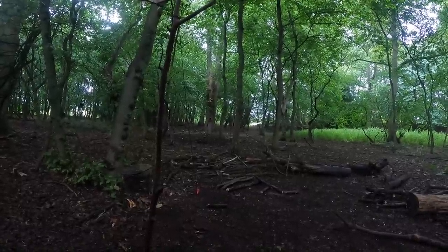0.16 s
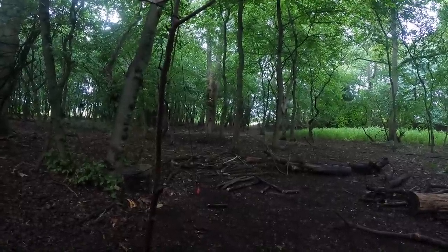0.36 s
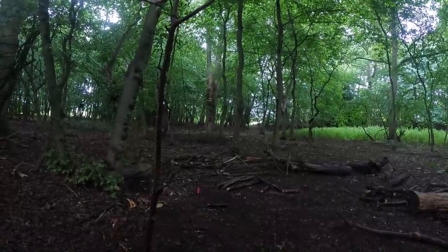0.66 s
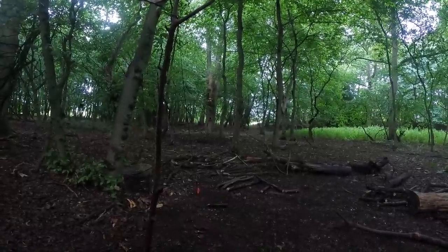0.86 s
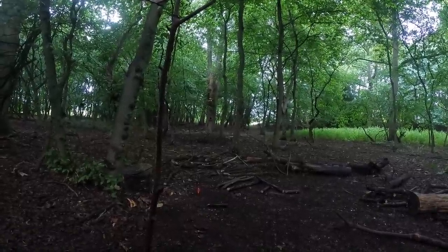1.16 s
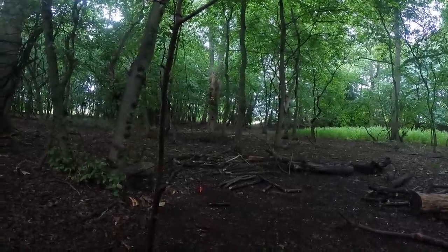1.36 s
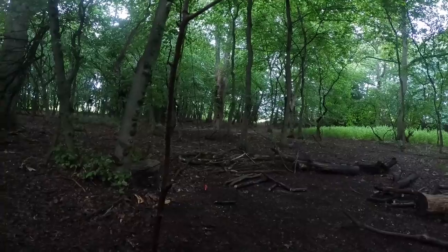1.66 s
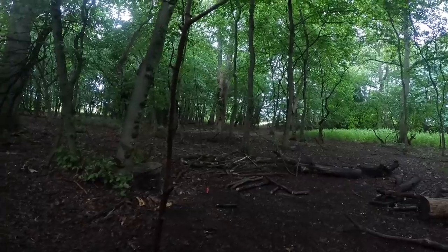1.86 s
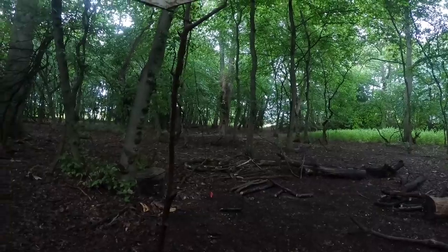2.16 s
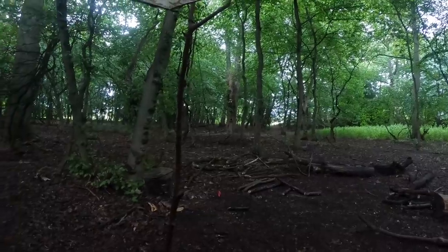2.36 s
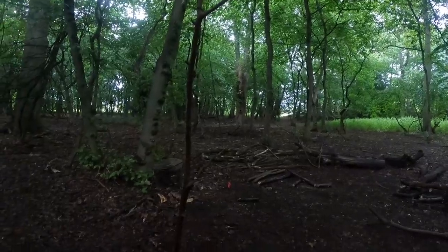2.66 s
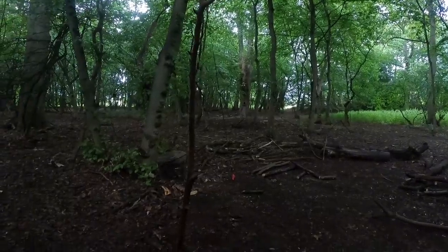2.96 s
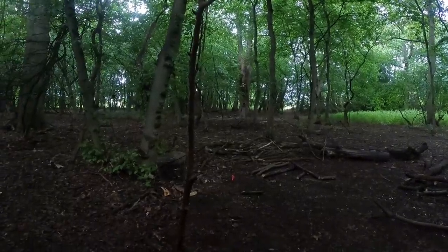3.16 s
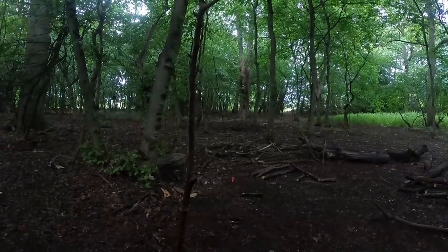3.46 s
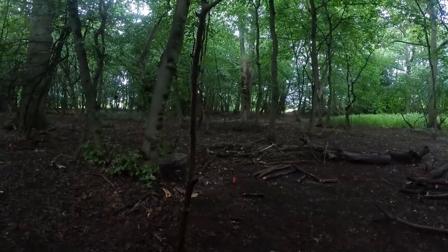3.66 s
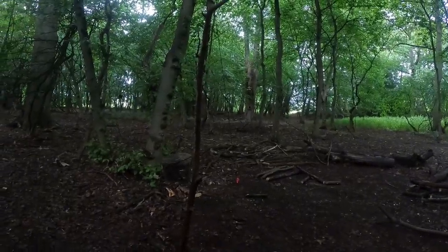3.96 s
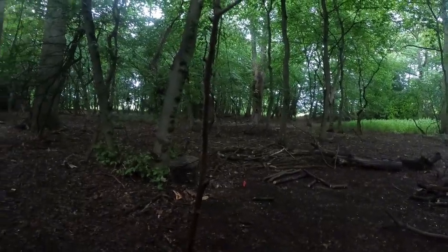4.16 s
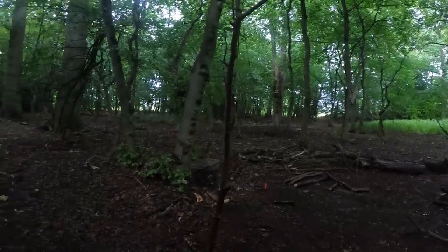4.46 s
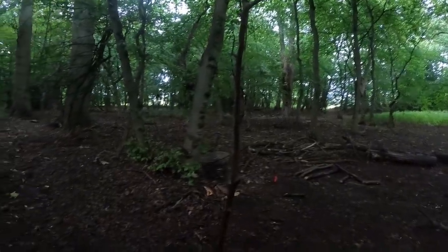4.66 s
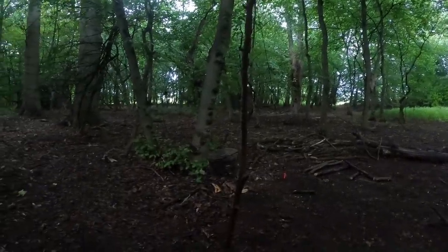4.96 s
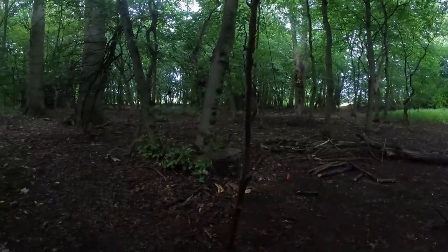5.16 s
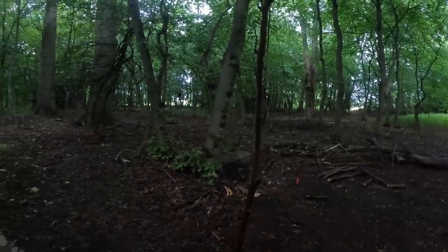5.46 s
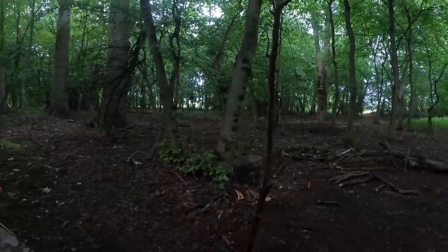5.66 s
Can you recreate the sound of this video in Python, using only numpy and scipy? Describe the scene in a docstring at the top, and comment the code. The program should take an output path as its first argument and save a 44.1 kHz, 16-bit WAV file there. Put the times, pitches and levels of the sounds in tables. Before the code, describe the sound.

Irregular sharp drops hit stretched fabric, faint drips patter further off, and a small bird sings high, rapid trills in a quiet wood.

```python
"""Heavy drops smack the taut tarp close overhead; lighter ones patter further off in the wet wood.
A wren whistles and trills, echoing among the trunks, and fabric rustles once near the end.
Drops are impacts on damped fabric modes, the wren is gliding tones, the echoes are dying noise.
Rustle, soft hiss, the wood's low murmur and the microphones' own noise are coloured noise."""
import sys
import numpy as np
from scipy import signal
from scipy.fft import rfft, irfft
from scipy.io import wavfile

SR = 44100
rng = np.random.default_rng(int(sys.argv[2]) if len(sys.argv) > 2 else 0)


def int16_out(signal):
    """Quantize to a 16-bit WAV file."""
    q = np.round(np.clip(np.atleast_2d(signal).T, -1, 1) * 32767)
    wavfile.write(sys.argv[1], SR, q.astype(np.int16))


N = 257103
TIME = np.arange(N) / SR


def from_db(db):
    """Decibels to amplitude gain."""
    return 10 ** (np.asarray(db) / 20)


def rms_one(x):
    """Scale to rms 1."""
    return x / np.sqrt(np.mean(x ** 2) + 1e-20)


def unit_energy(x):
    """Scale to energy 1 (sum of squares)."""
    return x / np.sqrt(np.sum(x ** 2) + 1e-20)


def add(track, s, sound):
    """Mix a sound into the track at time s, cut where the track ends."""
    at = max(0, round(s * SR))
    track[at:at + len(sound)] += sound[:max(0, N - at)]


def band(x, low_hz, high_hz, order=2):
    """Causal band-pass."""
    sos = signal.butter(order, [low_hz, high_hz], "band", fs=SR, output="sos")
    return signal.sosfilt(sos, x)


def resonate(x, hz, width_hz):
    """Ring one resonance, whose gain is about 1 at its peak."""
    r = np.exp(-np.pi * width_hz / SR)    # pole radius: a wider resonance dies sooner
    numerator = np.array([1, 0, -1]) * (1 - r * r) / 2
    return signal.lfilter(numerator, [1, -2 * r * np.cos(2 * np.pi * hz / SR), r * r], x)


def dying_noise(t, t60):
    """Noise that falls 60 dB in t60 seconds; energy 1."""
    return unit_energy(rng.standard_normal(len(t)) * from_db(-60 * t / t60))


def coloured_noise(spectrum):
    """Steady noise shaped by (f/Hz, relative level/dB) points; rms 1."""
    hz, db = np.transpose(spectrum)
    bins_hz = np.fft.rfftfreq(N, 1 / SR)
    gain = from_db(np.interp(np.log(bins_hz + 1), np.log(hz), db))    # + 1 avoids log 0
    return rms_one(irfft(rfft(rng.standard_normal(N)) * gain, N))


def flutter(per_s):
    """Random wander: straight lines between normal random values, per_s of them a second."""
    knots = np.arange(0, TIME[-1] + 1, 1 / per_s)
    return np.interp(TIME, knots, rng.standard_normal(len(knots)))


def blow(t, scatter_db, t60):
    """A sharp impact, then ripples that scatter back from seams and edges."""
    onset = 1 - np.exp(-(t / 0.00026) ** 2)
    ripples = unit_energy(dying_noise(t, t60) * onset)
    return (t == 0) + from_db(scatter_db) * ripples


def sheet_mode(t, hz, width_hz, scatter_db, t60):
    """A heavily damped mode of the sheet, driven by one blow; energy 1."""
    return unit_energy(resonate(blow(t, scatter_db, t60), hz, width_hz))


def tarp_drops(thump_db=-3, knock_db=-2.0, ring_db=-3, snap_db=14, contact_hz=9000,
               ground=0.035, ground_s=0.0064):
    """Each drop lands with a snap, dents the sheet (thump, pat, knock) and rings the tight weave."""
    # drops overhead: t/s, level/dB, pat f/Hz, knock f/Hz, ring f/Hz, hardness/dB (favours upper modes)
    drops = [(0.2564, -31.5, 680, 1480, 3900, 3), (0.872, -29.5, 680, 1240, 3260, -3),
             (1.007, -56, 624, 1280, 3130, 1), (1.087, -45, 980, 1350, 3600, 0.5),
             (1.2488, -51.5, 990, 1400, 4600, 5.5), (1.409, -56.5, 950, 1860, 2930, 5),
             (1.5635, -30.5, 810, 2060, 3180, 0.5), (2.5538, -25, 440, 1270, 2800, -1.5),
             (2.895, -60.5, 790, 1930, 3940, 4), (2.9923, -35.5, 964, 1250, 4100, 5),
             (3.218, -50.5, 1030, 1400, 3330, -2.5), (3.263, -48.5, 855, 1320, 2880, -1.5),
             (3.295, -57.5, 533, 1900, 5100, 1.5), (3.395, -33, 744, 2130, 4460, 4)]
    thump_hz = 210    # every drop shares the sheet's low thump
    thump_width_hz, pat_width_hz, knock_width_hz, ring_width_hz = 280, 500, 750, 900
    snap_gains, thump_loses = 0.23, 0.1    # shares of the hardness, dB per dB
    out, t = np.zeros(N), TIME[:SR // 10]
    # water takes a moment to flatten, which softens the top
    soft = signal.butter(1, contact_hz, fs=SR, output="sos")
    for s, db, pat_hz, knock_hz, ring_hz, hard_db in drops:
        ring = sheet_mode(t, ring_hz, ring_width_hz, scatter_db=-3.5, t60=0.037)
        knock = sheet_mode(t, knock_hz, knock_width_hz, scatter_db=-5, t60=0.017)
        pat = sheet_mode(t, pat_hz, pat_width_hz, scatter_db=-15.0, t60=0.04)
        thump = sheet_mode(t, thump_hz, thump_width_hz, scatter_db=-9, t60=0.037)
        # neighbouring modes swing in opposite directions
        sheet = (from_db(ring_db + hard_db) * ring - from_db(knock_db + hard_db) * knock
                 + pat - from_db(thump_db - thump_loses * hard_db) * thump)
        snap = band(blow(t, -10, .04), 3500, 9500, order=1)
        snap = snap / np.abs(snap).max()
        # the modes' levels are rms over 20 ms, the snap's is a peak
        hit = sheet * np.sqrt(.02 * SR) + from_db(snap_db + snap_gains * hard_db) * snap
        hit = from_db(db) * signal.sosfilt(soft, hit)
        add(out, s, hit)
        add(out, s + ground_s, ground * hit)    # echo from the ground
    return out


def drip(hz, width_hz=1300):
    """A dull, distant tap: one broad resonance struck by a blow; peak 1."""
    tap = resonate(blow(TIME[:SR // 15], -0.31, 0.066), hz, width_hz)
    tap = band(tap, 200, 4300, order=1)
    return tap / np.abs(tap).max()


def far_drips(level_db=4, patter_db=-60, spread_db=4, largest_db=-46, count=130):
    """Drips further off: the clearest at set times over a random patter of fainter ones of the same kind: many
    faint, few clear."""
    # clearest drips further off: t/s, peak level/dB (before level_db), f/Hz
    drips = [(0.117, -47, 1070), (0.409, -46.5, 2070), (0.427, -46, 2240), (1.687, -46.5, 2450),
             (1.924, -44, 651), (1.993, -44, 2820), (2.316, -43.5, 2600), (2.679, -43, 660),
             (3.424, -45, 1210), (3.722, -44, 1560), (4.077, -45, 1180), (4.401, -42, 680),
             (5.116, -46.5, 2050)]
    out = np.zeros(N)
    for s, db, hz in drips:
        add(out, s, from_db(db + level_db) * drip(hz))
    for when, size, pitch in rng.random((count, 3)):
        db = min(patter_db - spread_db * np.log(1 - size), largest_db)    # exponential spread in dB
        add(out, when * TIME[-1], from_db(db) * drip(800 * 4 ** pitch))   # 800 to 3200 Hz
    return out


def whistle(hz, edge, waver=0.0045, flutter_db=2.0):
    """A near-pure tone along a pitch track; pitch and level waver together, ends are soft."""
    u = np.linspace(0, 1, len(hz))
    shake = np.interp(TIME[:len(hz)] * 200, np.arange(64), rng.standard_normal(64))    # 200 values a second
    swell = np.sin(np.pi / 2 * np.clip(np.minimum(u, 1 - u) / edge, 0, 1))
    phase = 2 * np.pi * np.cumsum(hz * (1 + waver * shake)) / SR
    return swell * from_db(flutter_db * shake) * np.sin(phase)


def trill(run, first_db, last_db, count):
    """A run of falling chirps that grows steadily louder."""
    first, period, length, top_hz, bottom_hz, late = run
    out, fall = np.zeros(N), np.linspace(top_hz, bottom_hz, int(length * SR))
    for k, db in enumerate(np.linspace(first_db, last_db, count)):
        chirp = whistle(fall, edge=0.5, waver=.01, flutter_db=1.0)
        add(out, first + k * period + k % 2 * late, from_db(db) * chirp)
    return out


def wren(whistle_db=-1, fade_db_per_s=29):
    """Whistles slide onto a pitch and bend away from it, among a slow and a fast trill."""
    # whistled notes: t/s, length/s, held f/Hz, level/dB (before whistle_db; at mid-note), syllable
    notes = [(1.028, 0.063, 5700, -65, "rise"), (1.198, .04, 4490, -61.5, "sweep"),
             (1.312, 0.037, 4490, -55, "sweep"), (2.228, 0.13, 7510, -51.5, "arch"),
             (2.394, 0.032, 4600, -52, "chirp"), (2.453, 0.12, 7320, -51, "arch"),
             (2.62, 0.023, 4640, -48.5, "chirp"), (2.669, 0.14, 7410, -52, "arch"),
             (3, 0.095, 4830, -42.5, "slur"), (3.17, 0.068, 3630, -53.5, "rise"),
             (3.266, 0.057, 6980, -47.5, "arch"), (3.415, 0.064, 5770, -46, "arch"),
             (3.533, 0.076, 4100, -47, "hook"), (3.64, 0.033, 4720, -47, "sweep"),
             (3.699, 0.099, 4110, -48.5, "hook"), (3.874, .2, 6945, -50, "slur"),
             (4.131, 0.088, 4900, -42, "slur"), (5.204, 0.08, 6550, -47.5, "lift"),
             (5.442, 0.15, 8170, -57, "arch"), (5.626, 0.025, 5170, -46, "chirp"),
             (5.657, 0.034, 4340, -53, "sweep"), (5.681, 0.14, 8060, -57, "arch")]
    # syllables, as bends in fractions of the held pitch:
    # start bend, settling time/s, end bend, power of the note's progress that the end bend grows with
    syllables = {"arch": (-.11, .009, -.15, 3.3), "slur": (.1, .027, -.02, 2), "hook": (.05, .02, -.18, 7),
                 "lift": (.025, .012, .04, 2), "rise": (-.06, .02, .01, 2), "sweep": (-.08, .02, .11, 1.2),
                 "chirp": (.14, .018, -.16, 1.5)}
    # runs of falling chirps: first t/s, period/s, length/s, top f/Hz, bottom f/Hz,
    # lateness of every second chirp/s
    slow_run = (1.599, .0895, .032, 5850, 4050, 0)
    fast_run = (4.3485, .02895, .008, 6450, 4600, .0015)
    out = trill(slow_run, first_db=-49.5, last_db=-45.5, count=7)
    out += trill(fast_run, first_db=-53, last_db=-52.5, count=29)
    for s, length, held_hz, db, syllable in notes:
        start_bend, settle_s, end_bend, power = syllables[syllable]
        t = TIME[:int(length * SR)]
        bend = start_bend * np.exp(-t / settle_s) + end_bend * (t / length) ** power
        note_db = db + whistle_db - fade_db_per_s * (t - length / 2)    # each note fades as it goes
        add(out, s, from_db(note_db) * whistle(held_hz * (1 + bend), edge=0.14))
    return out


def trunks(x, near_db, near_t60, far_db, far_t60):
    """Echoes from nearby trunks and a longer tail from the depth of the wood, as dying noise."""
    t = TIME[:int(1.5 * SR)]
    echo = from_db(near_db) * dying_noise(t, near_t60) + from_db(far_db) * dying_noise(t, far_t60)
    onset = 1 - np.exp(-t / 0.0017)
    return signal.fftconvolve(x, echo * onset)[:N]


def rustle(grain_db=2.5, snags_per_s=250, snag_db=-5):
    """Fabric slides over fabric with a grainy swish; threads snag and let go with tiny ticks."""
    # the rustle's rise and fall: t/s, level/dB
    swell = [(4.05, -81), (4.13, -68), (4.18, -60.5), (4.29, -56), (4.39, -56), (4.45, -67), (4.62, -79)]
    # its colour: f/Hz, relative level/dB per Hz
    colour = [(300, -38), (700, 12), (1300, 5), (2300, 4.5), (3500, 12), (6000, 3), (9000, -2.5),
              (13000, -5.5), (16000, -32)]
    snags = (rng.random(N) < snags_per_s / SR) * rng.standard_normal(N)
    ticks = from_db(snag_db) * rms_one(band(snags, 600, 11000, order=1))
    swish = from_db(grain_db * flutter(190)) * coloured_noise(colour)
    return from_db(np.interp(TIME, *np.transpose(swell))) * (swish + ticks)


def background(murmur_db=-63.0, hiss_db=-1):
    """A low, steady, distant murmur and a soft hiss of wet leaves that swells with the fabric rustle."""
    # low murmur of the wood: f/Hz, relative level/dB per Hz
    wood = [(18, -34), (30, -6.5), (70, 3.5), (150, 3.5), (213, -1), (332, -7.5), (600, -17.5), (1500, -33)]
    # colour of the soft hiss: f/Hz, relative level/dB per Hz
    hiss_colour = [(210, -30), (350, -9.5), (1050, -8), (1130, -7), (1230, -10), (2000, -11), (2710, -8),
                   (4570, -11), (6380, -13.5), (15500, -37)]
    # level of the soft hiss within 600-2800 Hz: wet leaves, with the fabric rustle swelling at 4.27 s:
    # t/s, level/dB (before hiss_db)
    hiss_levels = [(0.0, -65), (2.65, -63), (3.95, -66), (4.27, -61.5), (4.53, -66), (5.83, -64.5)]
    hiss = coloured_noise(hiss_colour)
    hiss = hiss / np.std(band(hiss, 600, 2800))
    hiss_gain = from_db(np.interp(TIME, *np.transpose(hiss_levels)) + hiss_db)
    return from_db(murmur_db) * coloured_noise(wood) + hiss_gain * hiss


def scene():
    """Drops, wren and their echoes, rustle and background reach both channels alike."""
    rain, bird = tarp_drops() + far_drips(), wren()
    rain_echo = trunks(rain, near_db=-20, near_t60=0.32, far_db=-28.5, far_t60=1.0)
    rain_echo = band(rain_echo, 1800, 10000, order=1)
    bird_echo = trunks(bird, near_db=-3.5, near_t60=0.13, far_db=-2.5, far_t60=1.16)
    return np.tile(rain + rain_echo + bird + bird_echo + rustle() + background(), (2, 1))


def record(dry, self_noise_db=-79, cutoff_hz=15800):
    """Each microphone adds a faint noise of its own; the top is cut steeply."""
    # self-noise of each microphone: f/Hz, relative level/dB per Hz
    self_noise = [(20, -7.5), (60, -1), (250, -10.5), (1000, -17.5), (4000, -52), (16000, -14)]
    own = from_db(self_noise_db) * np.array([coloured_noise(self_noise) for channel in dry])
    steep = signal.ellip(10, .1, 80, cutoff_hz, fs=SR, output="sos")
    return signal.sosfilt(steep, dry + own)


dry = scene()
out = record(dry)
int16_out(out)
```